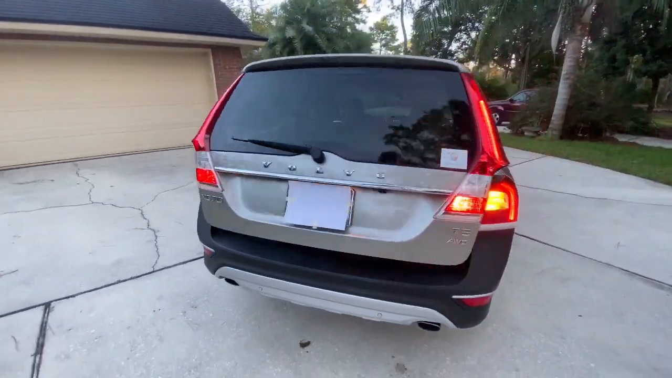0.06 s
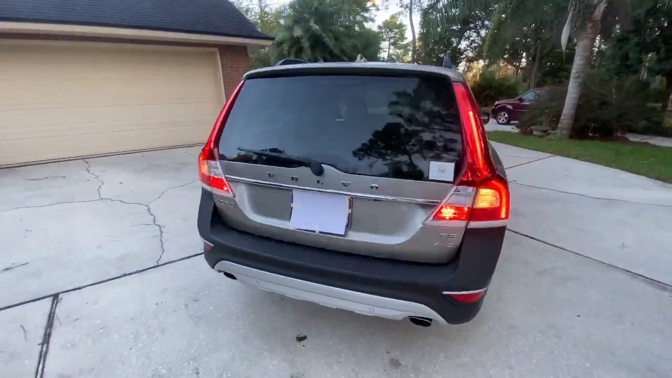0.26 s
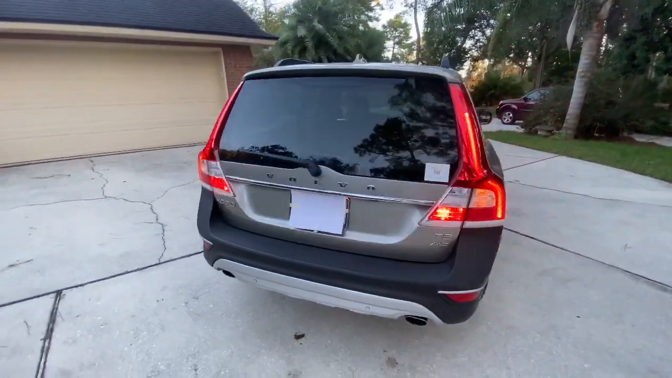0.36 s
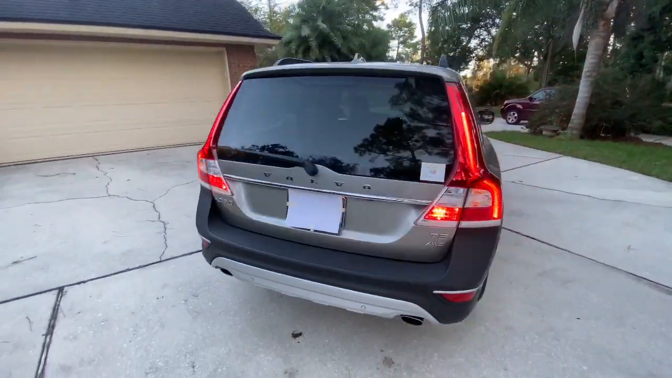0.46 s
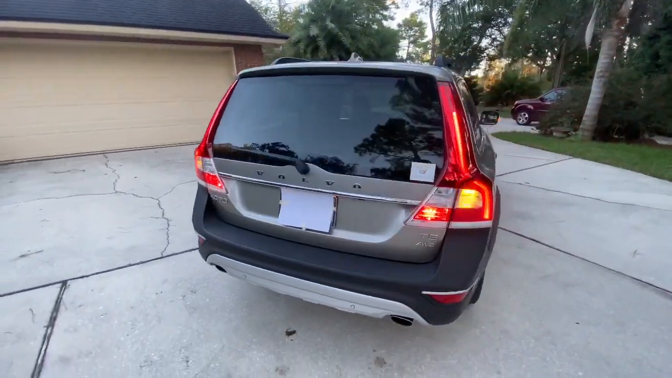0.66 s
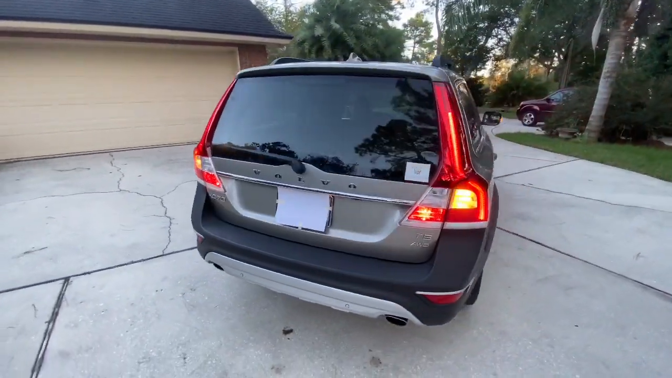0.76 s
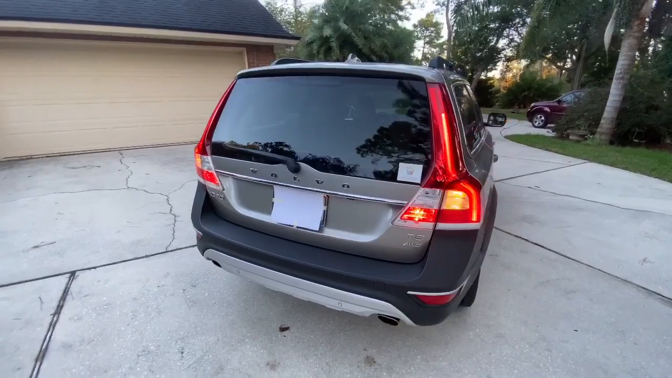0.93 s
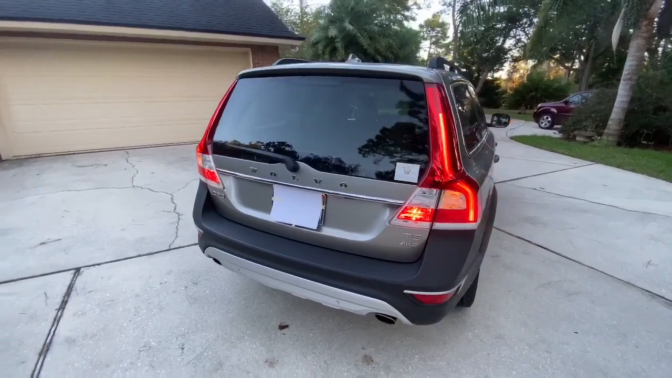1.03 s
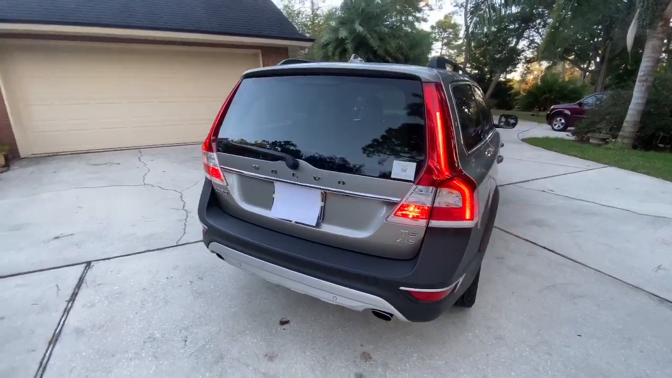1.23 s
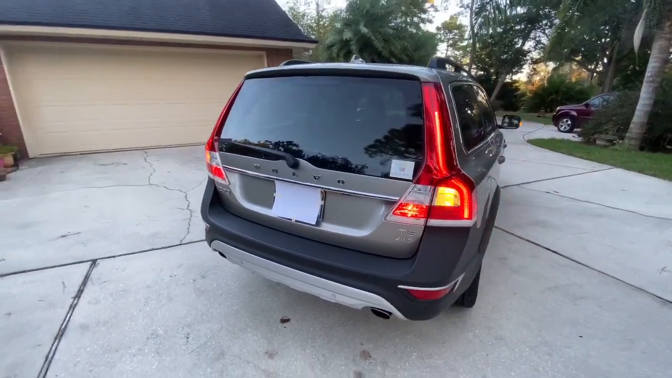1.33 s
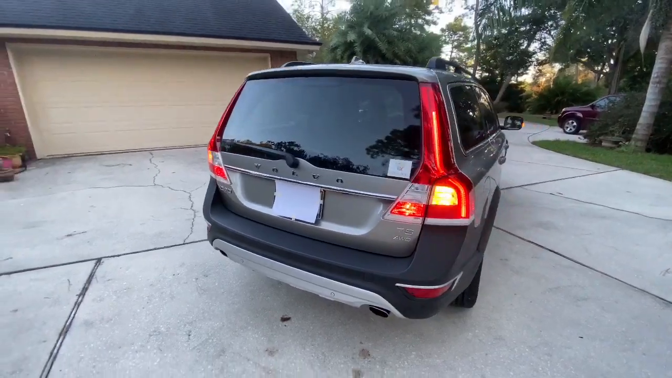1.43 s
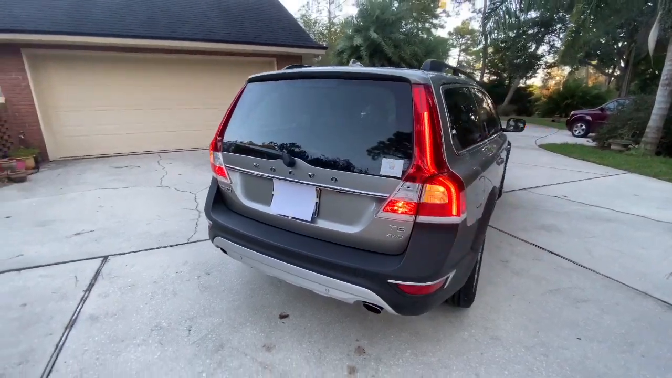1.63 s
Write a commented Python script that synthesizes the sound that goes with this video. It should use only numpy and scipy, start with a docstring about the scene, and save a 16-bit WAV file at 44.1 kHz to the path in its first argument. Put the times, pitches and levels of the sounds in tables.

```python
"""A car's power tailgate shuts on a driveway, in stereo, with the engine idling beneath it.
The gate meets its rubber seal, the latch snaps and the gate slams: bursts of coloured, decaying noise.
Decaying sines ring the panel and striker and boom in the cabin; bright noise ticks are loose trim.
Duller, later noise bursts stand for returns from nearby walls, the slam's low thud among them.
Exhaust harmonics throb throughout, with noise hiss from the engine bay and wavering or steady whines."""
import sys
import numpy as np
from scipy import signal
from scipy.io import wavfile

SR = 44100
rng = np.random.default_rng(int(sys.argv[2]) if len(sys.argv) > 2 else 0)


def generate_wav(sig):
    """Save sig (samples, or channels by samples) to the path in sys.argv[1] as 16-bit PCM at SR."""
    pcm = np.round(np.clip(np.atleast_2d(sig).T, -1, 1) * 32767).astype(np.int16)
    wavfile.write(sys.argv[1], SR, pcm)


N = 74970
T = np.arange(N) / SR  # time [s]

# Engine-bay and outdoor air colour: f/Hz, relative density/dB per Hz
AIR_COLOUR = [(30, -16.5), (62, -13.5), (105, -9.5), (200, -17.5), (400, -27.5), (1000, -28), (2100, -34.5),
              (2700, -44.5), (3600, -37.5), (4500, -44), (5500, -40), (6800, -55), (11000, -52.5),
              (15500, -63)]
# Stereo image of that air: f/Hz, left-right likeness/1, left minus right/dB
AIR_IMAGE = [(110, 0.95, .5), (356, 0.86, 3), (690, 0.28, 2), (2250, 0.058, 4.5), (5340, 0.047, 5),
             (8040, 0.067, -0.5)]
# Engine accessories: f/Hz, level/dB rms, unsteadiness/1
ACCESSORY_HUMS = [(76.5, -51, .35), (312, -63, .7)]
# Belt drive, level before its swell: f/Hz, level/dB rms, unsteadiness/1
BELT_TONES = [(985, -66.5, 4), (1572, -61.5, 1.2)]
# Electrical whine: t/s, level/dB rms
WHINE_LEVEL = [(0, -69), (.3, -71), (.47, -79), (.9, -80), (1.15, -71.5), (1.27, -87), (1.37, -69),
               (1.7, -73)]
# Exhaust harmonics from the firing rate upwards: relative level/dB
EXHAUST_HARMONICS = [-7.5, -4.7, 0, -6.4, -7.5, -18, -16, -23]
# Gate's drive motor, before fade and pan: f/Hz, level/dB rms, unsteadiness/1
MOTOR_TONES = [(420, -66, 4), (775, -59, 2.5), (860, -65, 4)]
# Ticks of loose trim and latch parts: t/s, level/dB
TICK_TIMES = [(0.303, -46), (.3215, -42), (0.3408, -38), (0.36, -42), (0.483, -50)]
# Tick colour: f/Hz, relative density/dB per Hz
TICK_COLOUR = [(1500, 6), (4000, 8), (8000, -29), (12000, 6.5), (15500, -13)]
# Duller short bursts, mostly closing sounds returned from nearby walls: t/s, level/dB, hold/s
RETURN_TIMES = [(0.363, -42, 0.0025), (0.421, -39.5, 0.007), (0.482, -43.5, 0.0054), (0.536, -47.5, 0.013)]
# Colour of those bursts: f/Hz, relative density/dB per Hz
RETURN_COLOUR = [(200, 4), (600, 2.5), (2000, 1), (2900, -12), (5400, -15), (15500, -32)]
# Slam's low thud returned from nearby walls, colour: f/Hz, relative density/dB per Hz
THUD_RETURN_COLOUR = [(100, -4.5), (300, -1), (500, -3.5), (750, -13), (1500, -23), (4000, -50)]
# Cabin air and body shell: start t/s, f/Hz, peak level/dB, attack/s, hold/s, t60/s
BOOM_MODES = [(.265, 63, -8, .003, .021, .08), (.2765, 186, -10.5, .002, .01, .06),
              (.277, 290, -15.5, .002, .008, .045), (.3175, 70, -22.5, .004, .028, .06),
              (.334, 200, -28, .008, .014, .06), (.396, 42, -30, .004, .008, .04),
              (.452, 58, -33, .018, .045, .07)]
# Steel striker's modes: f/Hz, relative level/dB
STRIKER_MODES = [(4091, -9), (4441, 0), (4565, -4), (5356, -7), (5620, -7)]
# Gate panel's modes: f/Hz, relative level/dB
PANEL_MODES = [(551, -9), (585, -5), (618, -4), (779, -10), (822, -7), (1124, -6), (1166, -9), (1657, -10),
               (1884, -7), (1931, -8), (2336, -11)]
# Blows on the panel: t/s, relative level/dB
PANEL_BLOWS = [(0.233, -3), (0.2485, -2), (0.274, 4)]
# Stereo image of all closing noise bursts: f/Hz, left-right likeness/1, left minus right/dB
GATE_IMAGE = [(118, 1, 3), (290, 0.92, -1), (575, 0.24, 3), (1300, 0.74, 6), (2470, -0.34, 4),
              (5200, 0.11, 4), (8140, -0.73, 2.5), (11500, 0.56, 2), (13800, 0.086, -4)]
# Colour of each closing stage: f/Hz, relative density/dB per Hz
SEAL_COLOUR = [(120, -14), (350, 0.5), (668, 0.5), (1130, -10), (2030, -6.5), (3000, -21), (4500, -22),
               (9000, -44), (15500, -45)]
LATCH_COLOUR = [(88, -37), (170, 11.5), (404, -22), (1170, -1), (1450, -11), (2060, 3.5), (3690, -19.5),
                (5230, -10.5), (8660, -23), (11000, -14), (15500, -23)]
SLAM_COLOUR = [(76, 4.5), (150, 2), (307, 2), (619, -11.5), (1900, -9), (2600, -16), (4480, -26.5),
               (5800, -17), (7100, -41), (11000, -31.5), (15500, -45)]
TAIL_COLOUR = [(60, 3), (190, -3.5), (420, -16.5), (700, -17.5), (1000, -22.5), (2000, -26), (3000, -32.5),
               (8000, -38), (15500, -50)]
# Edges of the microphone's treble dip: f/Hz
MIC_DIP_EDGES = [12700, 13900]

AIR_DB, AIR_FLICKER_DB = -44.5, 0.83
BELT_SWELL_DB_PER_S, BELT_LOUDEST_S = 7, 1.42
WHINE_HZ = 10002
FIRING_HZ, FIRST_FIRING_S, SPEED_WANDER = 30.0, .0277, .0015
EXHAUST_DB, EXHAUST_FLUTTER = -39.1, .06
PIPE_DISPERSION_RAD = 1.2  # the pipe delays higher harmonics more, spreading each pulse over the cycle
MOTOR_STOP_S = .24
STRIKER_S, STRIKER_DB, STRIKER_T60_S = .274, -24.5, .085
PANEL_DB, PANEL_PAN_DB = -21, 7
PANEL_T60_S, PANEL_DAMPING = 0.082, 0.06  # t60 at 1 kHz; higher modes die sooner
TAIL_SHAKE_DB, TAIL_SHAKE_HZ = 2.5, 45
CUTOFF_HZ = 15900


def from_db(db):
    """Decibels to gain."""
    return 10 ** (np.asarray(db) / 20)


def rms_one(x):
    """Scale to rms 1."""
    return x / np.sqrt(np.mean(x ** 2) + 1e-20)


def at_hz(points, hz, axis=1):
    """Read a column of a table on a log-frequency axis."""
    p = np.array(points)
    return np.interp(np.log(hz), np.log(p[:, 0]), p[:, axis])


def pan(db):
    """Left and right gains for a level difference."""
    return from_db(np.array([[db], [-db]]) / 2)


def cut(x, hz, kind, order=2):
    """Butterworth filter."""
    sos = signal.butter(order, np.clip(hz, 10, .45 * SR), kind, fs=SR, output="sos")
    return signal.sosfilt(sos, x)


def drift(rate):
    """Random wander of rms 1, slower for a lower rate in Hz; computed at every 40th sample."""
    r = np.exp(-80 * np.pi * rate / SR)
    noise = rng.standard_normal(N // 40 + 2002)
    slow = signal.lfilter([1], [1, -2 * r, r * r], noise)[2000:]  # drop the filter's start-up
    return np.interp(np.arange(N) / 40, np.arange(len(slow)), rms_one(slow))


def envelope(start, attack, hold, t60):
    """Linear rise, hold, exponential decay; times in seconds."""
    t = T - start
    rise = np.clip(t / max(attack, 1e-4), 0, 1)
    decay = from_db(-60 * np.maximum(t - attack - hold, 0) / max(t60, 1e-3))
    return rise * decay


def bands(spectrum, stereo, shape):
    """Third-octave stereo noise of about rms 1, each band then multiplied by shape(Hz)."""
    edges = 22 * 2 ** (np.arange(30) / 3)
    white = rng.standard_normal((2, 2, N))
    out, power = 0, 0
    for k, (low, high) in enumerate(zip(edges, edges[1:])):
        hz = np.sqrt(low * high)
        mid, side = cut(white[k % 2], [low, high], "band")  # neighbours use separate noise
        alike = np.clip(at_hz(stereo, hz), -1, 1)
        gain = from_db(at_hz(spectrum, hz))
        pair = np.sqrt(1 + alike) * mid + np.sqrt(1 - alike) * side * [[1], [-1]]
        balance = pan(at_hz(stereo, hz, axis=2))
        out = out + gain * shape(hz) * balance * pair
        power += gain ** 2 * (high - low) * 2 / (SR / 2)
    return out / np.sqrt(power)


def tones(rows):
    """Wavering tones of rotating parts; higher ones waver faster, up to a limit."""
    out = 0
    for hz, db, rough in rows:
        rate = min(hz / 30, 28)
        waver = 1 + rough * (drift(rate) + 1j * drift(rate))  # amplitude and phase
        tone = np.real(waver * np.exp(2j * np.pi * hz * T))
        out = out + from_db(db) * rms_one(tone)
    return out


def air():
    """Engine-bay and outdoor noise across the stereo field, each band flickering on its own."""
    return from_db(AIR_DB) * bands(AIR_COLOUR, AIR_IMAGE, lambda hz: from_db(AIR_FLICKER_DB * drift(18.5)))


def whine():
    """A thin, steady-pitched electrical sine whose level rises and falls."""
    level = from_db(np.interp(T, *np.transpose(WHINE_LEVEL)))
    return level * rms_one(np.sin(2 * np.pi * WHINE_HZ * T))


def belt():
    """Wavering belt-drive tones that swell to a loudest moment and recede."""
    return tones(BELT_TONES) * from_db(-BELT_SWELL_DB_PER_S * np.abs(T - BELT_LOUDEST_S))


def engine_bay():
    """Air noise, accessory hums from rotating parts, belt and electrical whine together."""
    return air() + tones(ACCESSORY_HUMS) + belt() + whine()


def exhaust():
    """One smeared pulse per firing, built of harmonics that each flutter a little."""
    speed = FIRING_HZ * (1 + SPEED_WANDER * drift(0.99))
    turn = 2 * np.pi * (np.cumsum(speed) / SR - FIRING_HZ * FIRST_FIRING_S)
    pulses = 0
    for k, db in enumerate(EXHAUST_HARMONICS, 1):
        flutter = 1 + EXHAUST_FLUTTER * drift(7.3)
        pulses = pulses + from_db(db) * flutter * np.cos(k * turn - PIPE_DISPERSION_RAD * k ** 2)
    return from_db(EXHAUST_DB) * pulses


def motor():
    """The gate's rotating drive whines faintly, fading out just before the latch."""
    return tones(MOTOR_TONES) * np.clip((MOTOR_STOP_S - T) / 0.04, 0, 1) * pan(1.2)


def impact(spectrum, start, db, attack, hold, t60, damping):
    """A coloured noise burst: t60 holds at 1 kHz, higher bands die sooner."""
    def shape(hz):
        return envelope(start, attack, hold, t60 * (1000 / max(hz, 250)) ** damping)
    return from_db(db) * bands(spectrum, GATE_IMAGE, shape)


def wall_returns():
    """Duller short noise bursts, mostly the closing sounds returned from nearby walls."""
    bursts = sum(from_db(db) * envelope(s, 0.0061, hold, 0.031) for s, db, hold in RETURN_TIMES)
    return bands(RETURN_COLOUR, GATE_IMAGE, lambda hz: bursts)


def thud_return():
    """A dull low noise burst, the slam's low thud returned from nearby walls."""
    return impact(THUD_RETURN_COLOUR, start=.435, db=-35, attack=0.0067, hold=0.011, t60=0.051, damping=0.13)


def rattles():
    """Loose trim and latch parts give bright ticks of noise."""
    ticks = sum(from_db(db) * envelope(s, 0.0013, 0, 0.02) for s, db in TICK_TIMES)
    return bands(TICK_COLOUR, GATE_IMAGE, lambda hz: ticks)


def boom():
    """The gate pushes air into the cabin, and the body swings on its low modes."""
    out = 0
    for s, hz, db, attack, hold, t60 in BOOM_MODES:
        out = out + from_db(db) * envelope(s, attack, hold, t60) * np.sin(2 * np.pi * hz * (T - s))
    return out


def striker():
    """The steel striker's modes ring briefly as the gate slams home, out of step left to right."""
    ring = 0
    for hz, db in STRIKER_MODES:
        cycles = hz * T + rng.random() + 0.46 * rng.random((2, 1))
        ring = ring + from_db(db) * np.sin(2 * np.pi * cycles)
    return from_db(STRIKER_DB) * envelope(STRIKER_S, 0.00074, 0, STRIKER_T60_S) * ring * pan(2.9)


def panel():
    """Each blow pumps the panel's modes, which ring on; they reach the two sides slightly out of step."""
    out = 0
    for hz, db in PANEL_MODES:
        t60 = PANEL_T60_S * (1000 / hz) ** PANEL_DAMPING
        swing = sum(from_db(blow_db) * envelope(s, 0.0036, 0, t60) for s, blow_db in PANEL_BLOWS)
        aside = min(hz / 600, 1)  # stereo spread, full from 600 Hz up
        phase = rng.uniform(0, 2 * np.pi) + aside * rng.normal(0, 0.76, (2, 1))
        ring = swing * np.sin(2 * np.pi * hz * T + phase)
        out = out + from_db(PANEL_DB + db) * ring * pan(PANEL_PAN_DB * aside)
    return out


def tail():
    """The closing dies away as noise with a quickly shaking level."""
    noise = impact(TAIL_COLOUR, start=0.2906, db=-27, attack=0.013, hold=0.022, t60=0.7, damping=0.11)
    return noise * from_db(TAIL_SHAKE_DB * drift(TAIL_SHAKE_HZ))


def seal():
    """The gate meets its rubber seal: one noise burst for densely packed resonances."""
    return impact(SEAL_COLOUR, start=0.2277, db=-18.5, attack=0.0061, hold=0.0026, t60=0.25, damping=0.17)


def latch():
    """The latch snaps: two quick noise bursts for densely packed resonances."""
    first = impact(LATCH_COLOUR, start=.2495, db=-14, attack=0.0019, hold=0.0041, t60=0.033, damping=0.25)
    second = impact(LATCH_COLOUR, start=.2572, db=-18.5, attack=0.0012, hold=0.0011, t60=0.078, damping=0.25)
    return first + second


def slam():
    """The gate slams home: two noise bursts for its dense resonances, the second ringing longer."""
    first = impact(SLAM_COLOUR, start=.272, db=-11.5, attack=0.00068, hold=0.0036, t60=0.034, damping=0.22)
    second = impact(SLAM_COLOUR, start=.278, db=-12.5, attack=0.0009, hold=0.0022, t60=0.094, damping=0.15)
    return first + second


def scene():
    """Seal, latch and slam in quick succession over the idle, then rattles, returns and tail."""
    idle = engine_bay() + exhaust()
    after = wall_returns() + thud_return() + rattles() + tail()
    ringing = boom() + striker() + panel()
    closing = seal() + latch() + slam()
    return idle + motor() + after + ringing + closing


def record(dry):
    """The stereo microphone dips in the high treble; the highest peaks are rounded and the top is cut."""
    heard = cut(dry, MIC_DIP_EDGES, "bandstop", order=1)
    rounded = heard / (1 + heard ** 6) ** (1 / 6)
    top_cut = signal.ellip(10, .1, 90, CUTOFF_HZ, fs=SR, output="sos")
    return signal.sosfilt(top_cut, rounded)


dry = scene()
out = record(dry)
generate_wav(out)
```